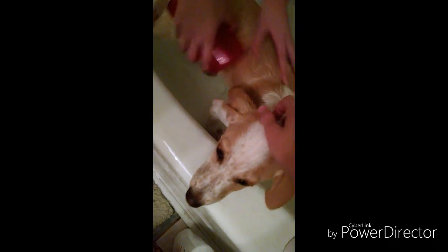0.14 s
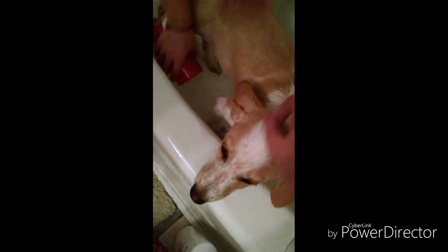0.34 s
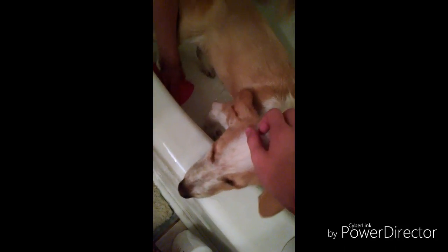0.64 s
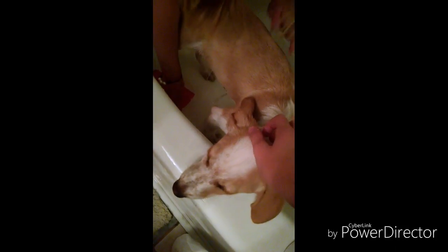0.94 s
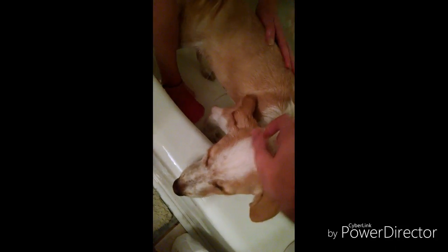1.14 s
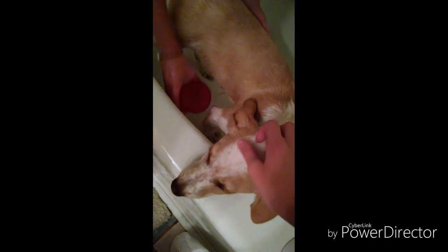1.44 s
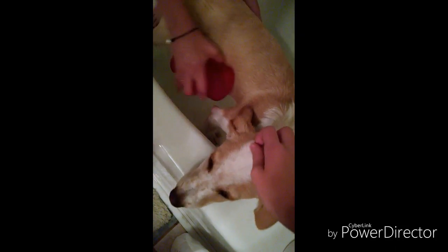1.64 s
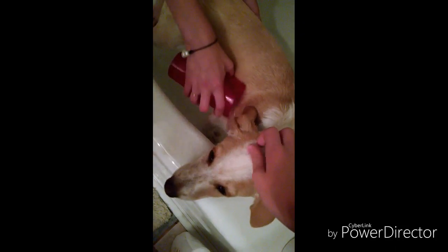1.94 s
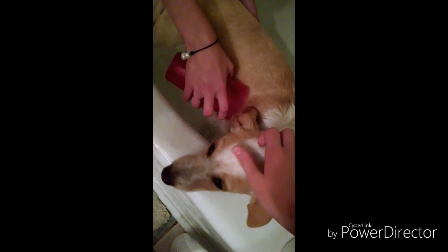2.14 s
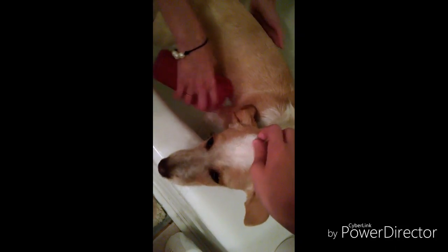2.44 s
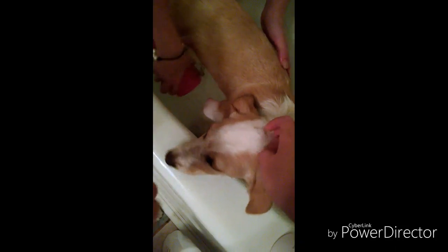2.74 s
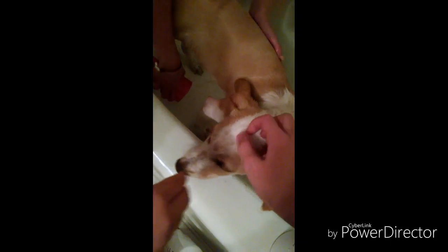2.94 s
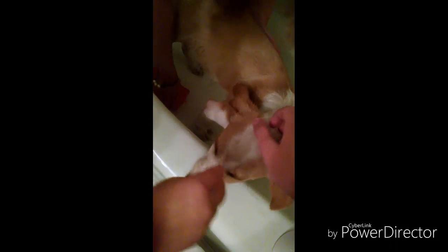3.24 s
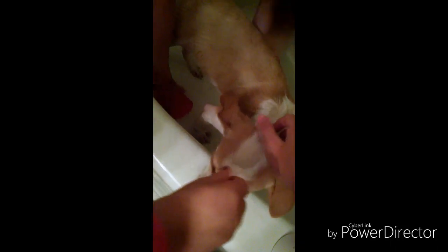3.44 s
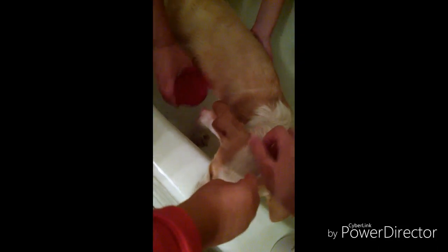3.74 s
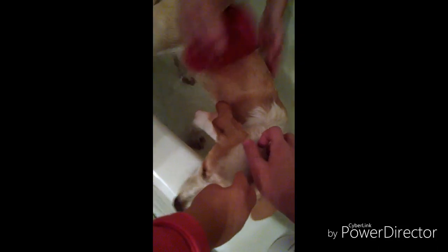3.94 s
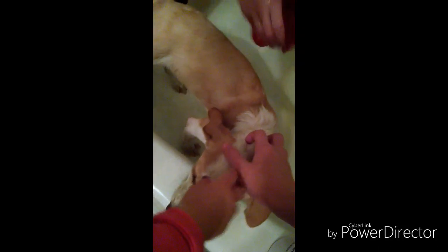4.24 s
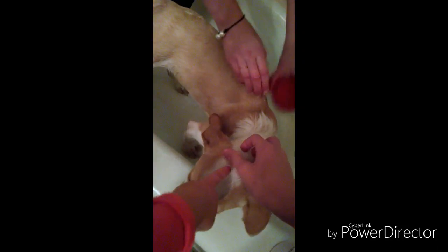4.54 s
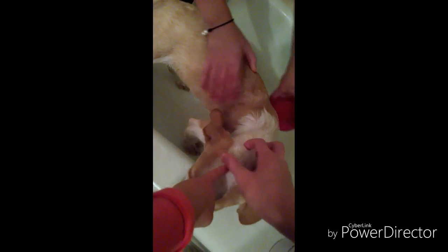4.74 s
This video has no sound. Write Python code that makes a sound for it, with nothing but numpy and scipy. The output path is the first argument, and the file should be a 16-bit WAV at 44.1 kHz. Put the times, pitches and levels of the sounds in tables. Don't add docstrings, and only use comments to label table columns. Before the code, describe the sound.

A cup rinses a dog in a shallow bathtub, heard close on a phone in a small tiled room with short reverberation and faint low hum. From 0 to 0.7 s, light drips, bubbles and spatters move over a soft trickle. Splashing thickens toward 1 s, and a firm plunge at about 1.1 s gives a low tub thud, hollow gulp and broad splash. Sharp slaps, a sliding sheet of water and bubbly glugs follow until 2.3 s. Around 2.4 to 3 s a denser pour hisses and rushes, with deep gulps near 2.5 s and a strong splash at 2.8 s. The brightest, hardest spatters crack at about 3.2 to 3.3 s, followed by low glugs. From 3.6 s, smaller plops and trickles continue, thinning after 4 s into scattered drops, with one crisp plop near 4.4 s and quiet dribbling to the end at almost 5 s.

```python
import sys
import numpy as np
from scipy import signal
from scipy.fft import rfft, irfft, next_fast_len
from scipy.io import wavfile
from scipy.ndimage import uniform_filter1d, map_coordinates

SR = 44100
rng = np.random.default_rng(int(sys.argv[2]) if len(sys.argv) > 2 else 0)


def transcribe(signal):
    frames = np.atleast_2d(signal).T
    limited = np.clip(frames, -1, 1)
    pcm = np.round(limited * 32767).astype(np.int16)
    wavfile.write(sys.argv[1], SR, pcm)


def level_to_linear(level):
    exponent = np.asarray(level, float) / 20
    return 10 ** exponent


N = 214882

# [t/s, level/dB]
RUNOFF = [(0.0, -40), (0.32, -41.5), (0.45, -40.5), (1.48, -33.5), (1.86, -41), (2.06, -39.5),
          (2.33, -39.5), (2.45, -27), (2.7, -25.5), (2.99, -26), (3.15, -37.5), (3.35, -42.5), (3.49, -41),
          (3.82, -38.5), (4.1, -43), (4.38, -47), (4.72, -45.5), (4.87, -42)]


def unit(x):
    return x / np.sqrt(np.mean(x ** 2) + 1e-20)


def along(points, hz):
    f, v = np.transpose(points)
    return np.interp(np.log(hz + 1), np.log(f + 1), v)


def bell(hz, centre_hz, width):
    return np.exp(-(np.log((hz + 1) / centre_hz) / width) ** 2)


def curves(rows):
    s, *cols = np.transpose(rows)
    return [np.interp(np.arange(N) / SR, s, c) for c in cols]


def wobble(rate):
    knots = rng.standard_normal(int(N * rate / SR) + 4)
    return map_coordinates(knots, [np.arange(N) * rate / SR])


def filtered(x, response):
    m = next_fast_len(N + 8192)
    return irfft(rfft(x, m) * response(np.fft.rfftfreq(m, 1 / SR)), m)[..., :N]


def rush(spectrum, patchy_db):
    z = signal.stft(rng.standard_normal(N + 512), nperseg=256)[2]
    field = uniform_filter1d(rng.standard_normal(z.shape), size=6, axis=0)
    field = uniform_filter1d(field, size=8, axis=1)
    x = signal.istft(z * level_to_linear(patchy_db * unit(field)), nperseg=256)[1][:N]
    return unit(filtered(x, lambda hz: level_to_linear(along(spectrum, hz))))


def bubbles(peak_s, hz, db, length, rise, size):
    t = np.arange(size) / SR
    peak_s, hz, db, life = (np.asarray(v)[:, None] for v in (peak_s, hz, db, length / 2.0))
    u = t / life
    swell = 1 - np.exp(-u / 0.34)
    phase = 2 * np.pi * hz * t * (1 + rise * (.5 * u - 1))
    ring = level_to_linear(db + 6.5) * swell * np.exp(-.8 * u) * np.sin(phase)
    start = np.round(np.maximum(peak_s - .6 * life, 0) * SR).astype(int)
    at = start + np.arange(size)
    return np.bincount(at.ravel(), ring.ravel(), N + SR)[:N]


def swarm(count, centre_hz, spread, cycles, scatter_db, rise, size):
    when, tone, big = rng.random((count, 3)).T
    at = (when * (N - 1)).astype(int)
    hz = np.clip(centre_hz[at] * np.exp(spread * (2 * tone - 1)), 150, 15000)
    db = -scatter_db * np.log(1 - .99 * big)
    return unit(bubbles(at / SR, hz, db, cycles / hz, rise, size))


def room_hum():
    # [f/Hz, level per Hz/dB]
    hum_spectrum = [(15, -9), (40, 17), (65, 8.5), (150, -10.5), (300, 6), (800, -5), (1400, -11),
                    (2200, -72)]
    return level_to_linear(-54.5) * rush(hum_spectrum, patchy_db=0.5)


def tiles(x):
    # [f/Hz, T60/s]
    decay_s = [(300, 0.18), (2000, 0.17), (10000, 0.082)]
    hz, t, z = signal.stft(rng.standard_normal(SR // 2), SR, nperseg=256)
    decay = level_to_linear(-60 * t / along(decay_s, hz)[:, None])
    tail = signal.istft(z * decay, SR, nperseg=256)[1]
    return signal.fftconvolve(x, np.pad(tail, (150, 0)) / np.linalg.norm(tail))[:N]


def spray():
    # [f/Hz, level per Hz/dB]
    spray_spectrum = [(500, -47), (1200, -3.5), (2500, 5), (4500, 2), (6200, -3), (10000, 2.5), (15000, -3)]
    spray_db = curves(RUNOFF)[0]
    thin = np.clip((-26 - spray_db) / 8, .3, 1)
    foam = swarm(count=6000, centre_hz=np.full(N, 7500.), spread=1.0, cycles=2.5,
                 scatter_db=9.0, rise=0.0057, size=96)
    spurts = level_to_linear(thin * (2.2 * wobble(12) + 2.2 * wobble(45)))
    hiss = thin * rush(spray_spectrum, patchy_db=2.2)
    hiss += np.sqrt(1 - thin ** 2) * rush(spray_spectrum, patchy_db=1.1)
    return level_to_linear(spray_db + 1.0) * spurts * (hiss + .2 * foam)


def wash():
    # [f/Hz, level per Hz/dB]
    wash_spectrum = [(200, -20), (350, 3), (700, -1.5), (1500, -10), (2300, -6), (3500, -32)]
    return level_to_linear(-51 + 2.1 * (curves(RUNOFF)[0] + 32.5)) * rush(wash_spectrum, patchy_db=2.9)


def splats():
    # [t/s, peak level/dB, centre f/Hz]
    handfuls = [(0.3625, -27, 1320), (0.446, -31, 910), (0.757, -26, 694), (0.876, -31.5, 1210),
                (1.013, -24, 1510), (1.05, -28, 1200), (1.11, -20, 1000), (1.399, -20, 1620),
                (1.665, -27, 770), (2.43, -19.5, 1100), (2.545, -31, 1000), (2.67, -25, 1500),
                (2.785, -16, 1760), (2.975, -37, 1110), (3.294, -20.5, 1350), (3.44, -33, 860),
                (3.6, -33, 920), (3.722, -24, 1000), (3.8, -28.5, 1190), (0.063, -30, 1190),
                (0.175, -34, 1510)]
    rise_s, t60_s, width = .002, 0.14, 0.67
    t = np.arange(8192) / SR
    hz = np.fft.rfftfreq(len(t), 1 / SR)
    out = np.zeros(N + len(t))
    for s, db, centre_hz in handfuls:
        burst = unit(irfft(rfft(rng.standard_normal(len(t))) * bell(hz, centre_hz, width)))
        envelope = level_to_linear(db - 6.5 - 60 * t / t60_s) * (1 - np.exp(-t / rise_s))
        out[round(s * SR):][:len(t)] += envelope * burst
    return out[:N]


def slaps():
    plops = [(0.3612, -16, 4550), (0.4344, -20, 4070), (0.4741, -24, 5800), (0.641, -22, 4370),
             (0.7056, -44, 3360), (0.737, -17, 5040), (0.795, -16, 5700), (0.9168, -18, 4600),
             (1.015, -13, 8500), (1.1142, -13, 5300), (1.399, -19, 3870), (1.513, -22.5, 4440),
             (1.89, -29.5, 4800), (2.0642, -23.5, 6050), (2.3387, -21, 3740), (2.4113, -18, 3640),
             (3.441, -33.5, 3880), (3.69, -23.5, 3820), (4.211, -28.5, 4220), (4.2452, -28, 7900),
             (4.3023, -27, 7300), (4.4228, -19.5, 4120), (4.79, -52, 3260), (0.302, -24.5, 6660),
             (1.76, -28.5, 3900), (2.223, -30, 3480), (2.55, -48, 4130), (2.682, -16.5, 4100),
             (3.1058, -51, 3030), (4.4937, -38, 4500), (2.243, -21.5, 4320), (1.634, -24, 3900),
             (1.706, -26.5, 4200), (2.14, -28.5, 3370), (3.765, -25.5, 3270)]
    spits = [(0.037, -24.5, 8700), (0.061, -21.5, 8100), (0.143, -29.5, 8100), (0.6, -18, 9300),
             (0.7802, -18, 8800), (0.988, -17, 13400), (1.0969, -20, 9200), (1.2825, -13, 7600),
             (1.454, -20.5, 9700), (1.483, -22, 8950), (1.554, -20.5, 9450), (1.6005, -20, 10600),
             (1.705, -35, 12100), (1.839, -25.5, 13800), (1.923, -18, 9050), (2.021, -23.5, 11700),
             (2.8993, -15, 8900), (3.177, -7, 8800), (3.8307, -20.5, 9300), (3.9213, -33, 10500),
             (3.934, -25, 9450), (4.041, -28.5, 10400), (4.073, -26, 11500), (4.13, -24, 12300),
             (4.494, -26.5, 13500), (4.5316, -21, 9300), (4.7143, -25.5, 8950), (4.826, -31, 8800),
             (1.1733, -21, 10700), (1.2577, -26, 11600), (1.6893, -28, 9530), (1.7946, -21, 13800),
             (2.1939, -27, 8840), (2.2757, -26.5, 8670), (2.807, -14.5, 8800), (3.731, -27.5, 8880)]
    snaps = [(1.118, -14, 3800), (1.284, -15.5, 7100), (1.5565, -19, 9500), (1.7105, -14, 13000),
             (1.8387, -15.5, 13800), (3.1785, -10.5, 9000), (3.1975, -5, 8900), (2.412, -12.5, 3600),
             (1.5, -20.5, 3100), (3.2984, -4.5, 9400), (3.8327, -13, 9300), (4.4234, -9.5, 4200),
             (.7372, -12, 4300), (.3626, -19.5, 3600)]
    sheets = [
        (1.342, -15.5, 4070),
        (1.62, -17.5, 4300),
        (2.4, -16.5, 14000),
        (3.762, -22.5, 2440),
        (4.354, -24, 12400),
        (3.2905, -12.5, 8400),
        (2.6, -30, 5400),
    ]
    plop, spit = (.25, 1000), (0.047, 2550)
    landings = [(*row, *plop, 1, 1) for row in plops] + [(*row, *spit, 1, 1) for row in spits]
    landings += [(*row, *spit, 4.1, 1) for row in snaps]
    landings += [(*row, *plop, 1, 6.3) for row in sheets]
    size = 8192
    hz = np.fft.rfftfreq(size, 1 / SR)
    out = np.zeros((2, N + size))
    lumps = np.pad(level_to_linear(2.5 * wobble(250)), (0, size))
    for s, db, centre_hz, t60_s, low_hz, pace, slows in landings:
        start = round(s * SR)
        t = pace * np.arange(size) / SR
        breadth = np.clip(0.81 * level_to_linear(0.32 * (db + 16.0)), .1, .9)
        skirt = hz ** 2 / (hz ** 2 + low_hz ** 2) * (0.46 + bell(hz, centre_hz, .8))
        colour = bell(hz, centre_hz, 0.16) + breadth * skirt
        both, left, right = unit(irfft(rfft(rng.standard_normal((3, size))) * colour))
        tick = 0.62 * level_to_linear(-60 * t / 0.026) + 0.27 * level_to_linear(-60 * t / 0.18)
        tail_s = np.clip(t60_s * level_to_linear(0.38 * (db + 44.0)), .04, .3)
        tail = 0.34 * level_to_linear(-60 * t / tail_s) * lumps[start:][:size]
        rise_s = np.clip(slows * 0.00047 * level_to_linear(-0.52 * (db + 19)), 5e-5, .006)
        noise = both + 1.616 * np.array([left, right])
        sound = noise * (tick + tail) * (1 - np.exp(-t / rise_s))
        out[:, start:][:, :size] += level_to_linear(db - 7.5) * sound
    return out[:, :N]


def shove(surge_db):
    # [f/Hz, level per Hz/dB]
    thud_spectrum = [(35, -50), (70, -8), (110, -10), (180, -6), (280, 4), (380, 0.5), (800, -67)]
    # [t/s, push level/dB]
    plunges = [
        (1.016, -37.5),
        (1.107, -29),
        (1.31, -52),
        (2.34, -50),
        (2.46, -56),
        (2.801, -35),
        (3.294, -40),
        (3.44, -36.5),
        (3.885, -48),
        (4.2, -51.5),
    ]
    rise_s, t60_s = 0.0039, 0.38
    push = np.hypot(level_to_linear(-57 + surge_db + 30), level_to_linear(-64))
    for s, db in plunges:
        t = np.clip(np.arange(N) / SR - s, 0, 2)
        push = np.hypot(push, level_to_linear(db - 60 * t / t60_s) * np.clip(t / rise_s, 0, 1))
    return push * level_to_linear(1.2 * wobble(20)) * rush(thud_spectrum, patchy_db=1.2)


def froth(surge_db):
    churn = swarm(count=3500, centre_hz=np.full(N, 950), spread=0.75, cycles=5.054,
                  scatter_db=2.5, rise=.05, size=600)
    runoff_feed = level_to_linear(-47 + 1.81 * (curves(RUNOFF)[0] + 32.5))
    return np.hypot(runoff_feed, level_to_linear(surge_db - 11.5)) * churn


def trickle(surge_db):
    small = swarm(count=900, centre_hz=1257 * np.exp(0.19 * wobble(8)), spread=0.24, cycles=7.8,
                  scatter_db=4.0, rise=.05, size=1800)
    return np.hypot(level_to_linear(surge_db - 9), level_to_linear(curves(RUNOFF)[0] - 17.5)) * small


def drips():
    # [t of maximum/s, peak level/dB, f/Hz]
    blips = [(0.069, -25.5, 1115), (0.093, -23, 1894), (0.185, -23, 1430), (0.331, -24.5, 1430),
             (0.371, -22.5, 1287), (0.451, -24.5, 966), (0.521, -22, 1155), (0.68, -27, 825),
             (0.71, -15, 3325), (0.738, -16, 4300), (0.788, -22, 1840), (0.881, -23, 1314),
             (0.921, -27.5, 1057), (1.042, -25.5, 1460), (1.055, -17, 1160), (1.114, -26, 1180),
             (1.402, -32, 760), (1.506, -24, 826), (1.664, -24.5, 1230), (1.81, -23.5, 1337),
             (2.45, -19.5, 1016), (3.305, -16, 4240), (3.644, -21.5, 874), (3.805, -18, 950),
             (3.992, -27.5, 1000), (4.022, -28, 890), (4.212, -16.5, 3806), (4.661, -28.5, 1310),
             (4.76, -30, 1400), (4.791, -25.5, 3210), (0.836, -35, 950), (1.019, -28, 1650),
             (1.182, -30, 1320), (1.289, -32, 1020), (1.385, -29, 1670), (1.442, -28, 1150),
             (1.542, -21, 2150), (1.601, -26.5, 1116), (1.634, -32, 1370), (1.926, -32.5, 1355),
             (2.198, -29, 1030), (2.794, -23, 1800), (2.912, -20.5, 1630), (3.303, -24, 1082),
             (3.605, -45, 1220), (3.685, -32, 940), (3.728, -26, 986), (3.807, -33, 1680),
             (3.845, -41, 940), (3.886, -27, 1150), (3.921, -29, 1333), (4.046, -27.5, 1067),
             (4.235, -39, 1070), (4.273, -34.5, 1374), (4.3, -42, 1400), (4.363, -32.5, 1174),
             (4.546, -50, 1390), (4.585, -41, 1380), (4.6, -39, 1070), (4.711, -34.5, 1350)]
    s, db, hz = np.transpose(blips)
    life_s = 0.01091 * (1e3 / hz) ** .6
    return bubbles(s, hz, db - 5.0, life_s, rise=0.034, size=3000)


def gliding_bubbles():
    # [t/s, peak level/dB, f/Hz,
    # climb as a share of f]
    glides = [(0.23, -46, 1540, 0.1), (0.378, -45, 1480, 0.38), (0.461, -42, 1810, 0.045),
              (0.57, -35.5, 1540, 0.28), (0.632, -37, 760, 0.18), (0.54, -30, 1800, 0.24),
              (0.925, -41, 1000, 0.085), (1.23, -39, 830, 0.039), (1.335, -28.5, 302, 0.18),
              (2.3, -35, 880, 0.086), (2.119, -44, 1000, 0.042), (2.289, -39.5, 1100, 0.023),
              (2.37, -35.5, 1036, 0.033), (4.4, -51, 1270, 0.017), (4.066, -41, 1410, 0.036),
              (4.132, -37, 1200, 0.011), (4.189, -45, 1160, 0.0089), (4.142, -37, 1140, 0.011),
              (0.084, -38, 1380, 0.017), (.7, -36, 850, 0.011), (.19, -41, 1890, 0.064),
              (0.41, -45, 1300, .02), (0.79, -42, 1400, 0.019), (0.988, -34.5, 2220, .02),
              (1.298, -32.5, 2300, 0.018), (1.6, -39, 1400, .1), (2.5, -40, 2050, .05),
              (4.1, -39, 2300, 0.082), (3, -38, 1800, 0.02), (2.7, -29.5, 1900, 0.02),
              (4.81, -45, 2100, 0.017), (4.325, -46, 1600, 0.014), (0.135, -37, 460, .02),
              (0.24, -37.5, 655, 0.021), (0.275, -38.5, 655, .02), (0.33, -40, 657, .02),
              (0.405, -36.5, 677, 0.033), (0.535, -37, 590, 0.018), (0.345, -39.5, 1553, 0.29),
              (0.815, -33, 648, .03), (1.165, -30, 502, 0.033), (2.57, -30.5, 482, .05),
              (2.7, -29.5, 449, .03), (2.87, -30, 430, 0.035), (2.93, -31, 461, 0.033),
              (4.165, -41.5, 1287, 0.022), (4.4, -45, 1335, 0.017), (4.68, -43, 1330, .02)]
    s, db, hz, climb = np.transpose(glides)
    return bubbles(s, hz, db + 2.5, 0.014 + 0.03 * climb, climb[:, None], size=3000)


def cup_surges():
    # [t/s, hold/s, level/dB, air pocket f/Hz]
    movements = [(-0.008, 0.326, -42, 477), (0.39, 0.17, -36, 648), (0.749, 0.03, -29.5, 585),
                 (1.016, 0.013, -30.5, 500), (1.105, 0.0062, -18, 518), (1.264, 0.26, -32.5, 620),
                 (1.638, 0.22, -38.5, 649), (1.991, 0.26, -38, 723), (2.359, 0.14, -41, 356),
                 (2.56, 0.223, -33, 510), (2.771, 0.27, -33, 434), (3.291, 0.19, -35.5, 476),
                 (3.59, 0.078, -40, 826), (3.713, 0.15, -36, 847), (3.902, 0.036, -45, 497),
                 (3.997, 0.12, -41, 920), (4.137, 0.21, -48.5, 1000), (4.63, 0.12, -48.5, 1130)]
    rise_s, t60_s, climb_per_s = 0.0086, 0.33, 0.73
    s, hold, db, hz = np.transpose(movements)[:, :, None]
    t = np.arange(0, N, 64) / SR - s
    decay = level_to_linear(db - 60 * np.clip(t - hold, 0, 2) / t60_s)
    power = (decay * np.clip(t / rise_s, 1e-4, 1)) ** 2
    total = power.sum(0)
    pitch = hz * (1 + climb_per_s * np.clip(t, 0, hold))
    mean_hz = (power * pitch).sum(0) / total
    return curves(np.transpose([t[0] + s[0], 10 * np.log10(total), mean_hz]))


def cup_gulps(surge_db, pocket_hz):
    # [t of maximum/s, peak level/dB, f/Hz, length/s]
    gulps = [(0.073, -22.5, 464, 0.018), (0.211, -31, 640, 0.0089), (0.571, -26, 582, 0.0078),
             (0.61, -30.5, 624, 0.0095), (0.771, -16, 634, 0.00805), (0.786, -34, 640, 0.011),
             (1.036, -21, 459, .017), (1.129, -15, 523, 0.0141), (1.145, -33, 507, 0.021),
             (1.351, -25, 442, .02), (1.368, -21, 604, 0.012), (1.403, -23.5, 726, 0.0055),
             (1.672, -17.5, 634, 0.0057), (1.759, -25, 678, 0.0085), (1.992, -28, 619, 0.012),
             (2.061, -22, 709, 0.0049), (2.174, -24, 636, 0.0051), (2.193, -23.5, 672, 0.016),
             (2.358, -27.5, 324, 0.019), (2.439, -19, 673, .01), (2.464, -14.5, 369.5, 0.036),
             (2.5, -16.5, 356.4, 0.0296), (2.52, -24.5, 385, 0.018), (2.8, -18, 443, 0.0088),
             (2.982, -16, 715, 0.0058), (3.315, -21.5, 460, 0.029), (3.35, -21, 427, 0.011),
             (3.386, -19.5, 456.5, 0.036), (3.461, -19.5, 444, 0.01), (3.743, -14.5, 767, 0.0054),
             (0.503, -31.5, 584, 0.011), (1.233, -23.5, 705, 0.0076), (1.496, -29, 866, 0.007),
             (2.042, -28, 806, 0.0071), (2.422, -30, 696, 0.0104), (2.553, -21, 844, 0.0076),
             (2.621, -31, 756, .008), (2.665, -30, 746, 0.0074), (2.746, -22.5, 447, 0.013),
             (2.846, -26.5, 423, 0.013), (3.024, -30, 739, 0.007), (3.307, -23.5, 656, 0.0064),
             (3.366, -21.5, 670, 0.0088), (3.393, -28.5, 785, 0.0074), (3.449, -24.5, 756, 0.0065),
             (3.615, -30.5, 750, 0.012), (3.662, -34, 835, 0.0056), (1.006, -31, 434, 0.009),
             (3.92, -37, 900, 0.0058), (4.056, -32, 805, 0.011), (.02, -32.5, 436, 0.013)]
    s, db, hz, length = np.transpose(gulps)
    strong = bubbles(s, hz, db - 4.5, length + 0.00329, rise=0.02, size=6000)
    crowd = swarm(count=1500, centre_hz=pocket_hz, spread=0.286, cycles=6.99,
                  scatter_db=4.0, rise=.05, size=3000)
    return strong + level_to_linear(surge_db - 8.0) * crowd


def scattered(x):
    # [f/Hz, level/dB]
    apart_db = [(60, 1), (300, 0), (700, -8), (2500, -7), (4000, -3), (7800, -3.5), (13000, -6)]
    hz, _, z = signal.stft(x * level_to_linear(1.5 * wobble(9)), SR, nperseg=512)
    drift = uniform_filter1d(rng.standard_normal((2,) + z.shape), size=3, axis=3)
    phase = np.exp(1j * np.angle(drift[0] + 1j * drift[1]))
    return signal.istft(z * phase * level_to_linear(along(apart_db, hz))[:, None], SR, nperseg=512)[1][:, :N]


def scene():
    surge_db, pocket_hz = cup_surges()
    air = wash() + splats() + shove(surge_db) + froth(surge_db) + trickle(surge_db)
    air += drips() + gliding_bubbles() + cup_gulps(surge_db, pocket_hz)
    hits = slaps()
    water = room_hum() + spray() + air
    reverberation = level_to_linear(-5.0) * tiles(air) + level_to_linear(-13.0) * tiles(hits.mean(0))
    near = np.tile(water + reverberation, (2, 1))
    return level_to_linear(1.5) * (near + scattered(near)) + hits


def two_ports(x):
    # [f/Hz, phase/rad]
    turn_rad = [(60, -2.6), (150, -1.9), (300, -1.9), (500, -1.85), (800, -2.3), (1200, -3), (2000, -3.14)]
    # [f/Hz, level/dB]
    sides_db = [(60, -3), (150, -4.5), (300, 2), (700, 2), (1200, -.8), (6000, 0), (9000, -1.3), (14000, 0)]
    half = np.array([[-.5], [.5]])
    lag = 17

    def response(hz):
        lead = 2 * np.pi * hz * lag / SR + along(turn_rad, hz)
        edge = level_to_linear(-np.clip((hz - 15600) / 9, 0, 50)) * (hz < 16500)
        rumble_cut = hz ** 2 / (hz ** 2 + 40 ** 2)
        return np.exp(1j * half * lead) * level_to_linear(-half * along(sides_db, hz)) * edge * rumble_cut

    return filtered(x, response)


def thrifty(ports):
    # [f/Hz, gap/dB]
    gap_db = [(700, 16), (1300, 12), (2400, 4), (4200, 5), (5300, 4), (7800, 8.5), (10400, 9), (13000, 6)]
    frame, start = 2048, 235
    pair = np.array([ports[0] + ports[1], ports[0] - ports[1]]) / 2
    pair = np.pad(pair, ((0, 0), (start, 0)))
    hz, _, z = signal.stft(pair, SR, window="cosine", nperseg=frame)
    band = np.sqrt(np.arange(z.shape[1]) * 3.5 + 140).astype(int)
    _, first, which = np.unique(band, return_index=True, return_inverse=True)
    power = np.add.reduceat(np.abs(z) ** 2, first, axis=1)
    fickle_db = 3 * unit(uniform_filter1d(rng.standard_normal(power.shape), size=2, axis=2))
    keep = power > power[::-1] * level_to_linear(-along(gap_db, hz[first])[:, None] + fickle_db) ** 2
    keep[:, :3] = True
    edge_hz = 15150 + 350 * unit(uniform_filter1d(rng.standard_normal(z.shape[2]), size=2))
    kept = z * keep[:, which] * (hz[:, None] < edge_hz)
    mid, side = signal.istft(kept, window="cosine", nperseg=frame)[1][:, start:][:, :N]
    return np.array([mid + side, mid - side])


def low_pass(x):
    return signal.sosfilt(signal.butter(12, 16630, fs=SR, output="sos"), x)


def record(dry):
    held = dry / (1 + np.abs(dry / .68) ** 4) ** .25
    mix = thrifty(two_ports(held))
    return low_pass(mix)


dry = scene()
out = record(dry)
transcribe(out)
```